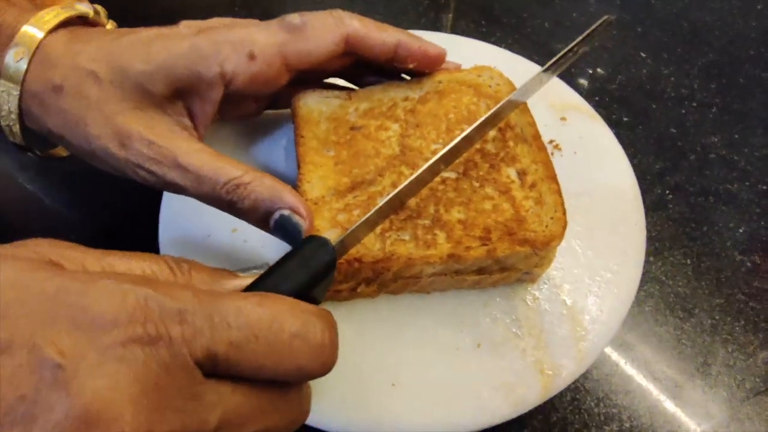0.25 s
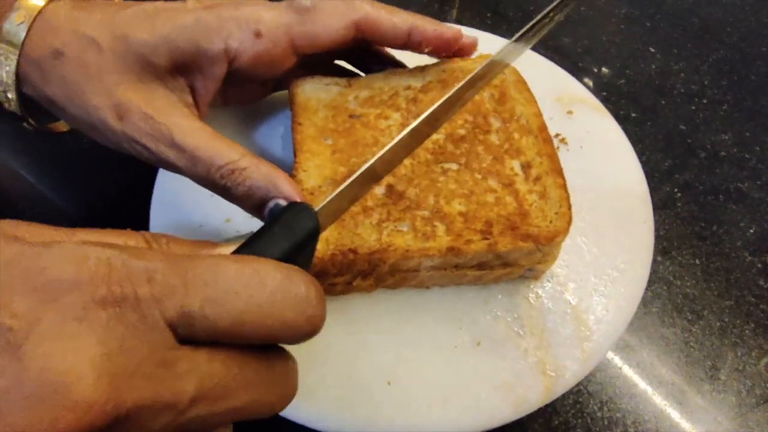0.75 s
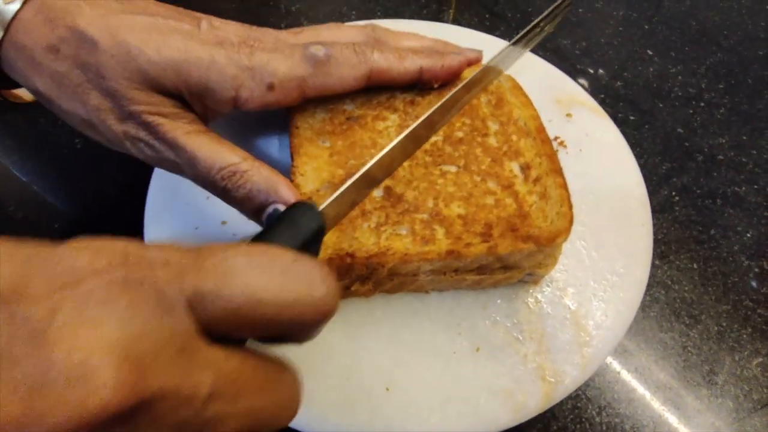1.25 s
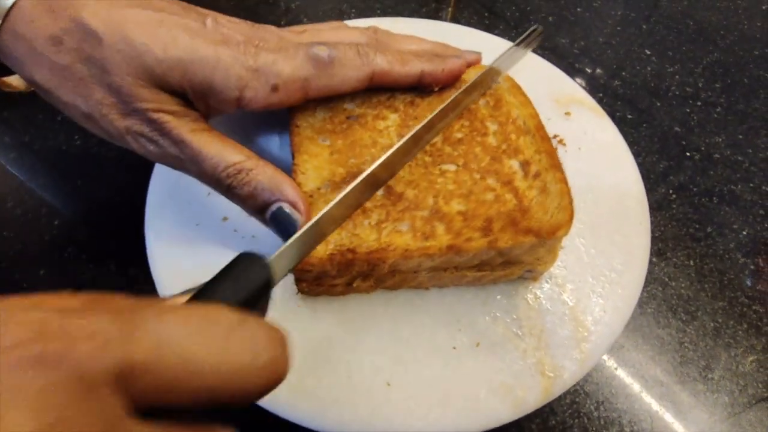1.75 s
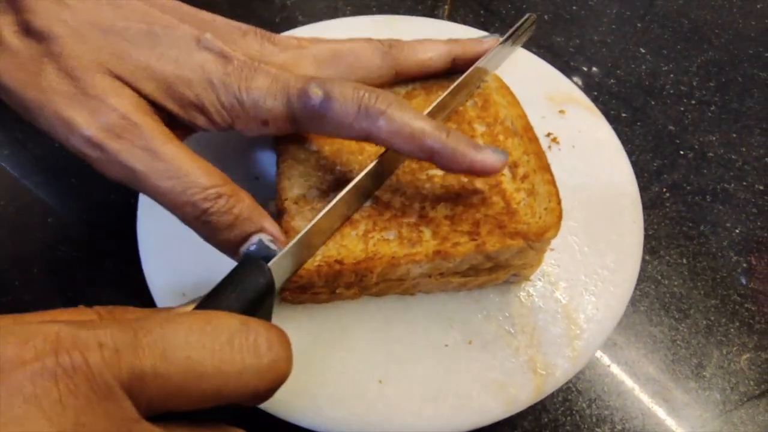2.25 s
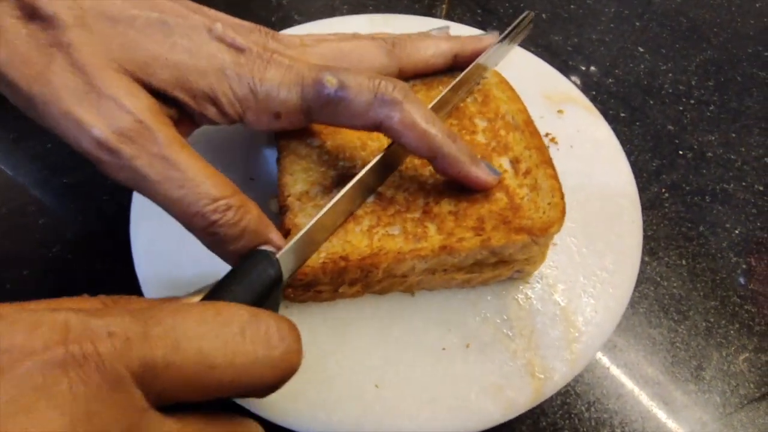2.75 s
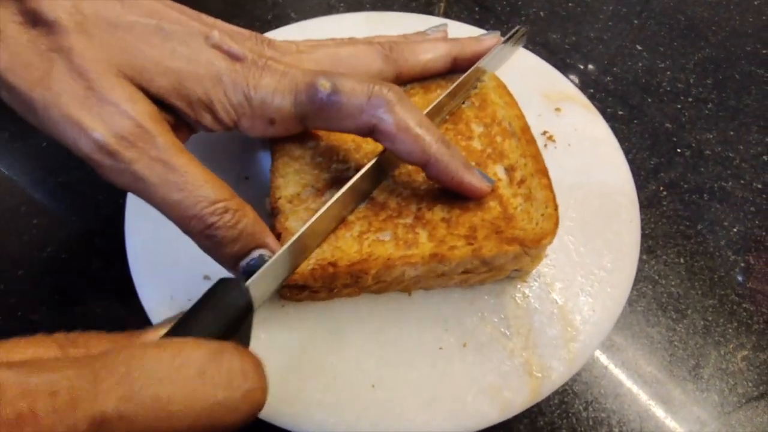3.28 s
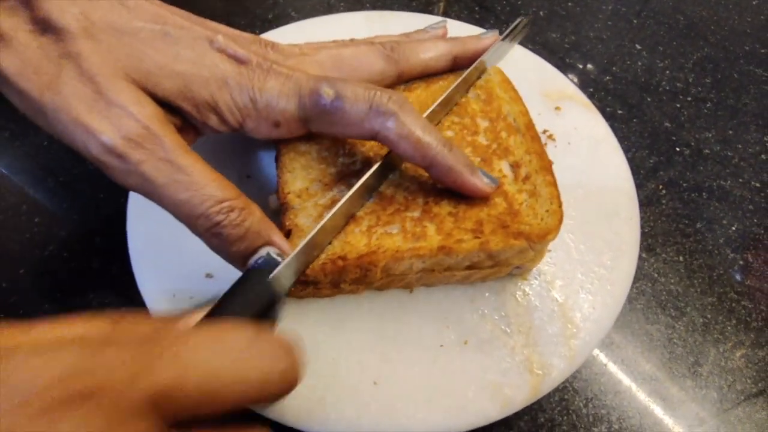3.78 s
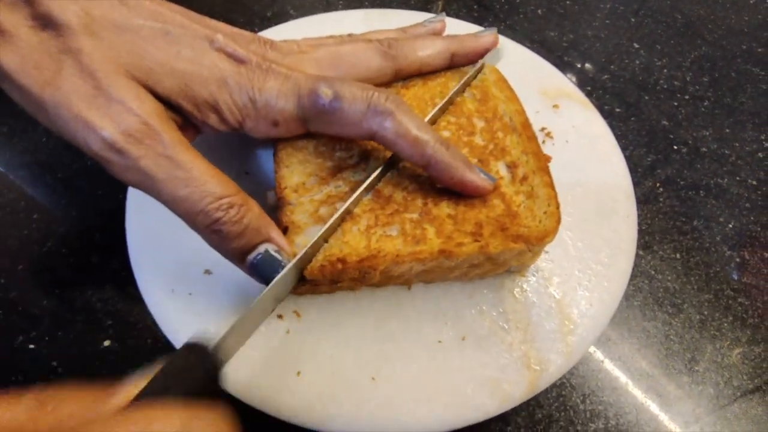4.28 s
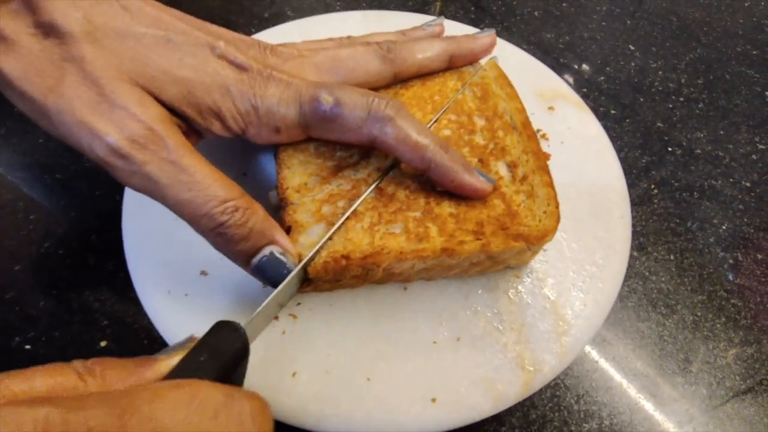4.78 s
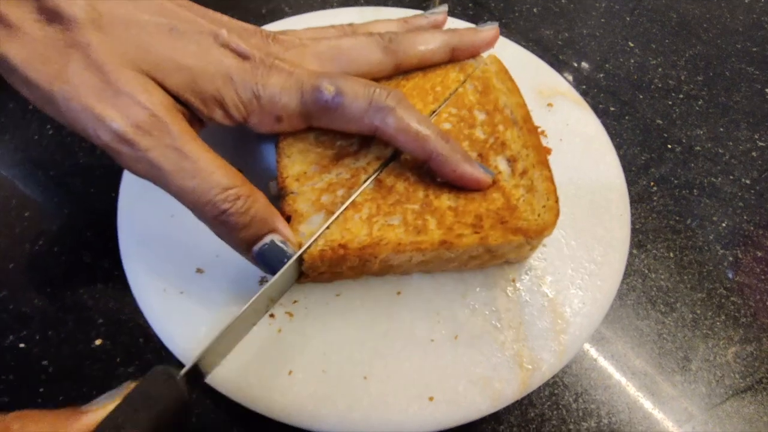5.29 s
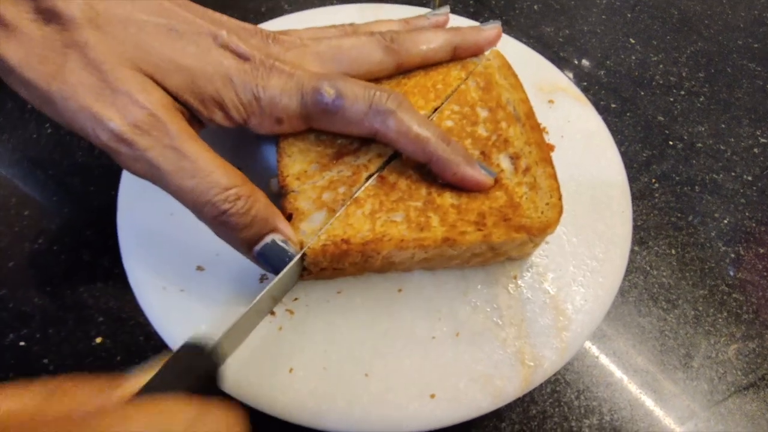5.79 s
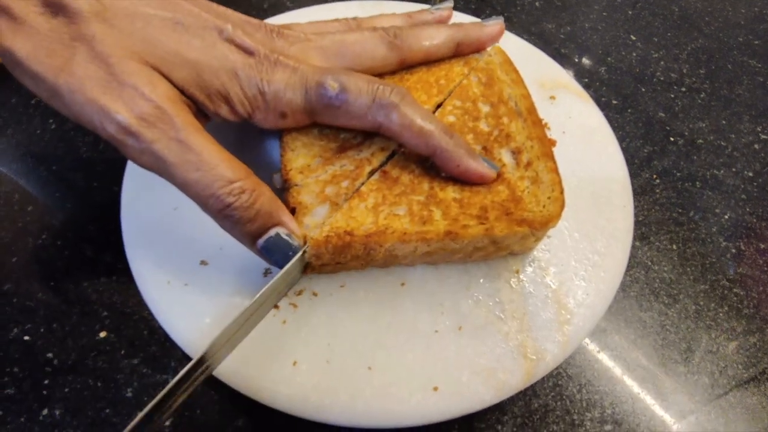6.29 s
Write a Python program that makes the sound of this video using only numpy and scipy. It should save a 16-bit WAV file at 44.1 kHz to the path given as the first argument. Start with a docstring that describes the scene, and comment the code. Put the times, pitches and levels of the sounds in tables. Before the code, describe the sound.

A small kitchen heard close up through a handheld stereo microphone, the knife brighter on the left. It starts almost silent, with tiny ticks; around 0.6 s a low wavering appliance hum with rumble and faint hiss comes up. From 0.7 to 1.5 s a serrated knife makes quick crunchy strokes, about six a second, breaking toasted crust with rasp beneath. A lull follows, with a couple of snaps near 1.65 s. From about 2.3 s come sharp crackles, and from 2.4 to 3.6 s the loudest sawing, full of snapping flakes. It weakens toward 4 s, then becomes soft, faint bread strokes. The plate knocks the counter with a short thud at 4.35 s and more softly at 5.1 s. Stronger crunches return at 5.1, 5.5 and 5.9 s, with slight blade scraping on the plate, fading to crackle and hum by 6.5 s.

```python
"""A small kitchen: a serrated knife saws a crisp toasted sandwich on a plate, close to a handheld camera.
Noise bursts from breaking crust cells and dragged bread follow the blade's speed; flakes snap as short pulses.
The plate knocks on the counter as ringing modes and a thud, and the blade skims it as resonant friction noise.
An appliance hums as wavering tones over rumble and hiss. The camera's left port faces the knife."""
import sys
import numpy as np
from scipy import signal
from scipy.fft import rfft, irfft, next_fast_len
from scipy.io import wavfile
from scipy.ndimage import map_coordinates

SR = 44100
rng = np.random.default_rng(int(sys.argv[2]) if len(sys.argv) > 2 else 0)


def wrap_up_sound(samples):
    """Save the sound to the file named by the first command line argument, as 16-bit audio."""
    columns = np.atleast_2d(samples).T
    # keep every value between -1 and 1, then stretch to whole-number steps
    tamed = np.clip(columns, -1, 1)
    steps = np.round(tamed * 32767).astype(np.int16)
    wavfile.write(sys.argv[1], SR, steps)


N = 288172

# pushes and pulls of the blade: start_s, length_s, fastest_point_share_of_length, crunch_db, rasp_db
STROKES = [(0.552, 0.11, 0.52, -58.5, -67.5), (0.741, 0.097, 0.24, -45.5, -47),
           (0.864, .16, 0.44, -40.5, -49), (1.048, 0.12, 0.56, -39, -46), (1.189, 0.15, .6, -39, -45.5),
           (1.366, 0.11, 0.49, -41.5, -48), (1.484, .14, 0.37, -61, -61), (1.635, 0.33, 0.22, -61, -82),
           (2.252, 0.25, 0.36, -51.5, -60.5), (2.427, 0.12, 0.35, -38, -55.5),
           (2.608, 0.13, 0.38, -40, -58), (2.742, 0.15, 0.92, -40, -55), (2.957, 0.11, 0.33, -35.5, -58),
           (3.104, 0.14, 0.72, -38.5, -50.5), (3.291, 0.15, 0.41, -39, -54.5),
           (3.465, 0.16, 0.53, -45, -55), (3.641, .13, 0.47, -52, -57), (3.819, 0.13, 0.67, -45.5, -46.5),
           (3.938, .15, 0.68, -49, -51.5), (4.11, .16, 0.4, -53.5, -56.5), (4.293, 0.21, 0.45, -59, -62),
           (4.453, 0.14, 0.53, -57, -55.5), (4.614, 0.12, 0.52, -57.5, -61), (4.8, 0.12, 0.31, -56.5, -63),
           (4.969, 0.11, 0.58, -51.5, -52), (5.134, 0.15, 0.66, -40.5, -51), (5.309, .11, 0.41, -52, -60),
           (5.531, .22, 0.33, -43.5, -49), (5.66, 0.29, 0.54, -53, -55), (5.851, 0.28, 0.48, -43.5, -47)]
# tone and place of the crunch: time_s, treble_gain_db, extra_left_minus_right_db
CRISPNESS = [(0.6, -3.5, -1), (1.4, 2, -0.5), (2.4, 0, 1), (3.4, 0, 0.5), (4.0, -0.5, -1), (5.2, -4, -3.5),
             (5.7, -4, -2), (6.05, -2.5, -0.5), (6.5, -7, -7)]
# flakes and ticks at set times, faint to loud: start_s, level_db, pitch_hz
TIMED_FLAKES = [(0.3404, -74, 2270), (0.3945, -69, 4830), (0.453, -54.5, 4720), (0.5863, -43.5, 4630),
                (0.626, -39, 3920), (0.733, -39.5, 3860), (0.7487, -29, 3800), (0.7852, -28.5, 4160),
                (0.9369, -25.5, 5300), (1.1468, -31, 4400), (1.2012, -35, 5690), (1.5085, -33, 5950),
                (1.6401, -29, 2180), (1.6799, -27.5, 7150), (1.8647, -46, 2620), (2.1166, -44, 2770),
                (2.15, -41, 6620), (2.173, -35, 5330), (2.2763, -27, 6150), (2.2827, -31, 3890),
                (2.3496, -25, 6230), (2.3624, -33, 6660), (2.389, -30, 6730), (2.4064, -25.5, 2700),
                (2.4913, -26, 5860), (2.6747, -20.5, 2700), (2.687, -29.5, 2590), (2.798, -22.5, 5910),
                (2.8518, -21, 4200), (2.872, -25.5, 3600), (2.9642, -27.5, 2660), (2.9721, -21, 2970),
                (2.995, -21.5, 3740), (3.0462, -24.5, 5100), (3.123, -31, 5900), (3.2219, -25, 2800),
                (3.2865, -26.5, 3510), (3.3064, -29, 3590), (3.4712, -38, 6790), (3.8033, -37.5, 4770),
                (4.9901, -38.5, 3980), (5.0337, -28, 4120), (5.918, -30.5, 2570), (6.0882, -28, 2360),
                (6.3779, -47, 2550)]
# crust crackling under the weight of blade and hand, also between strokes: time_s, level_db
PRESSING = [(0.53, -100), (0.6, -75), (1.1, -57), (1.7, -61.5), (2.08, -77), (2.6, -54.5), (3.4, -55.5),
            (3.8, -65), (4.3, -58.5), (4.8, -67), (5.3, -62.5), (5.47, -70), (6.1, -62.5), (6.5, -71.5)]
# plate rocking on the counter: start_s, low_thud_db, hard_contact_db
KNOCKS = [(4.349, -23, -30.5), (5.083, -28.5, -48.5)]
# modes of the loaded plate: pitch_hz, relative_level_db, t60_s
PLATE_MODES = [(250, 4, 0.11), (370, -4, 0.073), (528, -3.5, 0.18), (746, -14, 0.085), (820, -0.5, 0.045),
               (933, -14, 0.15), (1045, -11, 0.19), (1233, -3, 0.11), (1373, -1, 0.096), (2460, -25, .05),
               (2700, -26, .05)]
# blade dragging on the plate: start_s, length_s, plate_groan_db, steel_ring_db
SKIMS = [(3.128, 0.13, -49, -70), (3.872, 0.055, -67, -48.5), (4.474, 0.054, -52, -79),
         (5.158, 0.14, -58, -52), (5.557, 0.12, -64, -53), (5.639, 0.22, -49, -71), (5.896, 0.22, -69, -60),
         (6.243, 0.063, -62, -47)]
# blade resonances: pitch_hz, width_hz, relative_level_db
BLADE_MODES = [(1404, 63, 9.5), (2000, 520, -5), (2530, 170, 0.5), (2930, 260, -3.5), (4110, 250, -1.5),
               (5970, 990, -7)]
# background level: time_s, relative_level_db
ROOM_LEVEL = [(0, -75), (0.3, -76.5), (0.575, -64), (0.615, -52.5), (1.0, -50.5), (1.6, -47), (2.1, -50),
              (2.45, -45.5), (2.95, -44), (3.7, -47), (4.05, -44.5), (4.45, -43.5), (4.75, -50.5),
              (5.15, -43), (5.75, -49.5), (6.4, -44.5)]
# appliance hum: pitch_hz, relative_level_db, unsteadiness_db
HUM_TONES = [(50.66, 0, 2.5), (117.8, -6.5, 5.5), (154.4, -9, 0.5)]
# spectra of crust, bread, splinters, dull knock, rumble and hiss: frequency_hz, relative_level_db_per_hz
CRUST_SPECTRUM = [(300, -15), (900, -19), (1600, -8), (2100, 0), (2650, -1), (3300, -3.5), (4800, 0.5),
                  (6300, -1), (7600, -7), (8700, -6.5), (10500, -7), (12700, -2.5), (16000, -7.5)]
BREAD_SPECTRUM = [(60, -20), (140, -1), (220, -1.5), (330, -1), (420, -5), (520, 0.5), (800, 1), (1100, 0),
                  (1380, 1), (1700, -1.5), (2500, -7), (5000, -20.5)]
SPLINTER_SPECTRUM = [(300, -21), (1200, -6), (2300, -0.5), (6500, 1), (8500, -5), (12500, 1), (16000, -3.5)]
KNOCK_SPECTRUM = [(60, -12), (260, 10.5), (410, 0), (600, -2), (1100, 2.5), (1400, -3), (1700, -15),
                  (2800, -13.5), (3500, -36), (8000, -31)]
RUMBLE_SPECTRUM = [(10, -11), (28, -0.5), (40, -14.5), (58, -1.5), (75, -7.5), (125, -6.5), (170, -12.5),
                   (230, -12.5), (320, -21.5), (500, -26), (900, -36.5), (1800, -43.5), (4000, -58)]
HISS_SPECTRUM = [(300, -7), (1000, -18), (1800, 0.5), (2700, 2.5), (6200, -0.5), (8200, -7.5), (12500, -3),
                 (16000, -1)]
# straight sound at the two ports: frequency_hz, left_minus_right_db
PORT_FACING = [(200, 4.5), (1200, 0), (2500, 7), (5000, 9.5), (9000, 13), (14000, 3)]
# likeness of diffuse sound at the two ports: frequency_hz, coherence
PORT_COHERENCE = [(60, 0.98), (150, 0.97), (350, 0.82), (800, 0.69), (1500, 0.13), (16000, 0.016)]

TOP_HZ = 16100  # the camera's band limit
SPEED_POWER, BITE_DB = 0.92, 1.18  # loudness against blade speed; depth of the teeth's catching
SQUASH_DB = -68  # most that the bread sounds as it gives way under the weight
FLAKES_PER_S, FLAKE_HZ = 40, 5200  # rate and middle pitch of small flakes
FLAKE_DB, FLAKE_SPREAD_DB = -28.5, 6  # middle level in the hardest stroke; largest scatter either way
FLAKE_FOLLOW = 0.6  # dB of flake size for each dB of crunch
CRUST_CUT_S, CUT_DB = 3.45, -8.5  # once the top crust is cut through, the small flakes are weaker


def effort():
    """Crunch and rasp in dB: in each stroke the blade speeds up from rest and slows to turn round."""
    pressing_db, = curves(PRESSING)
    crunch = amp(pressing_db) ** 2
    rasp = amp(np.minimum(SQUASH_DB, pressing_db)) ** 2
    for start, length, fastest, crunch_db, rasp_db in STROKES:
        progress = np.arange(int(length * SR)) / (length * SR)
        turn = np.clip(fastest, .1, .9)  # leaves time to speed up and to slow down
        phase = np.interp(progress, [0, turn, 1], [0, .5, 1])
        drive = np.abs(np.sin(np.pi * phase)) ** SPEED_POWER
        add(crunch, start, (amp(crunch_db) * drive) ** 2)
        add(rasp, start, (amp(rasp_db) * drive) ** 2)
    return 10 * np.log10(crunch), 10 * np.log10(rasp)


def sawing(crunch_db, rasp_db):
    """Teeth break crust cells, more of them in a strong stroke, and drag through the bread below."""
    treble_db, left_db = curves(CRISPNESS)
    cells_per_s = 5500 * amp(.7 * (np.maximum(crunch_db, -62) - crunch_db.max()))
    bite_db = BITE_DB * wobble(160)  # the teeth catch and let go unevenly

    cells = amp(crunch_db + bite_db - 4.5) ** 2 * fractures(cells_per_s, spread_db=4.0, life=0.00034)
    crust = kitchen(cells, CRUST_SPECTRUM, near_db=1.5, tail_db=-11, tail_t60=0.34)
    treble = filtered(crust, lambda hz: 1 / (1 + (7500 / (hz + 1)) ** 6))
    crust = crust + (amp(treble_db) - 1) * treble
    crust = crust * amp([left_db / 2, -left_db / 2])

    crumbs = amp(rasp_db + bite_db - 1.57) ** 2 * fractures(cells_per_s, spread_db=4, life=0.00036)
    bread = kitchen(crumbs, BREAD_SPECTRUM, near_db=-1, tail_db=-10.5, tail_t60=0.24)
    return crust + bread


def fractures(rate, spread_db, life):
    """Energy of tiny bursts of random size at a changing rate per second; mean 1."""
    chance = np.clip(rate / SR, 1e-4, .5)
    size = amp(spread_db * np.minimum(rng.standard_normal(N), 2.5))
    breaks = rng.random(N) < chance
    energy = fading(breaks * size ** 2 / chance, life)
    return energy / energy.mean()


def small_flakes(crunch_db):
    """Rows (start_s, level_db, pitch_hz) of flakes that break at random, louder the harder the blade works."""
    draws = rng.standard_normal((400, 4))
    gaps = (draws[:, 0] ** 2 + draws[:, 1] ** 2) / (2 * FLAKES_PER_S)  # exponential waits
    times = STROKES[0][0] + np.cumsum(gaps)
    work_db = np.interp(times * SR, np.arange(N), crunch_db - crunch_db.max())
    level_db = FLAKE_DB + FLAKE_FOLLOW * work_db + CUT_DB * (times > CRUST_CUT_S)
    level_db = level_db + FLAKE_SPREAD_DB * np.tanh(draws[:, 2])
    pitch_hz = FLAKE_HZ * 2 ** (.5 * np.tanh(draws[:, 3]))
    return list(zip(times, level_db, pitch_hz))


def snaps(flakes):
    """A flake breaks with a pulse of a cycle or two, then sheds splinters for about a millisecond."""
    pulses, splinters = np.zeros(N), np.zeros(N)
    t = np.arange(SR // 50) / SR
    for start, level_db, hz in flakes:
        pulse = np.sin(2 * np.pi * hz * t) * np.exp(-t * hz)
        add(pulses, start + .001, amp(level_db + 2) * pulse)
        add(splinters, start + 0.0011, amp(level_db - 6) ** 2 * np.exp(-2 * t / 0.00052))
    return ports(pulses) + kitchen(splinters, SPLINTER_SPECTRUM, near_db=3, tail_db=0, tail_t60=0.15)


def shifting(pair, depth_db=2.5, band_hz=130, rate=7, size=1024):
    """The colour of the toast sounds drifts at random in narrow patches of pitch and time."""
    hz, t, bins = signal.stft(pair, SR, nperseg=size)
    band, frame = np.meshgrid(hz / band_hz, t * rate, indexing="ij")
    knots = rng.standard_normal((2, 512, 128))
    field = np.array([map_coordinates(k, [band, frame], order=1, mode="wrap") for k in knots])
    gain = unit(amp(depth_db * unit(field)))
    return signal.istft(bins * gain, SR, nperseg=size)[1][:, :N]


def knocks():
    """The plate's foot taps the counter and rings briefly; the counter follows with a low thud."""
    ring, thud, blow = np.zeros(N), np.zeros(N), np.zeros(N)
    t = np.arange(SR // 3) / SR
    swell = 1 - np.exp(-t / 0.00084)
    low = np.sin(2 * np.pi * 88 * t) * np.exp(-t / 0.0078) * swell
    for start, thud_db, contact_db in KNOCKS:
        modes = np.zeros(len(t))
        for hz, db, t60 in PLATE_MODES:
            decay = amp(db + rng.normal(0, 2.6) - 60 * t / t60)  # each tap excites the modes differently
            modes += decay * np.sin(2 * np.pi * (hz * t + rng.random()))
        add(ring, start, amp(contact_db - 8.5) * modes)
        add(blow, start, amp(contact_db - 2.5) ** 2 * np.exp(-2 * t / 0.0064))
        add(thud, start + 0.00334, amp(thud_db + 2.5) * low)
    return ports(ring) + thud + kitchen(blow, KNOCK_SPECTRUM, near_db=-0.5, tail_db=-4.0, tail_t60=0.33)


def skims(plate_width_hz=70):
    """Steel slides on the plate: friction noise excites the modes of both."""
    press, touch = np.zeros(N), np.zeros(N)
    for start, length, plate_db, steel_db in SKIMS:
        stroke = np.sqrt(np.abs(np.hanning(int(length * SR))))
        add(press, start, amp(plate_db) * stroke)
        add(touch, start, amp(steel_db) * stroke)
    groan = rubbed([(hz, plate_width_hz, db) for hz, db, t60 in PLATE_MODES])
    steel = rubbed(BLADE_MODES)
    return ports(press * groan + touch * steel)


def rubbed(modes):
    """Steady friction noise through resonances in parallel, with alternating sign; rms 1."""
    def body(f):
        return sum((-1) ** k * amp(db) * 1j * f * width / (hz * hz - f * f + 1j * f * width)
                   for k, (hz, width, db) in enumerate(modes))
    return unit(filtered(rng.standard_normal(N), body))


def background():
    """Wavering hum tones, low rumble and faint hiss share one level, which rises steeply near 0.6 s."""
    level_db, = curves(ROOM_LEVEL)
    t = np.arange(N) / SR
    hum = np.zeros(N)
    for hz, db, waver_db in HUM_TONES:
        level = amp(db + waver_db * wobble(2.995))
        hum += level * np.sin(2 * np.pi * hz * t + 0.44 * wobble(5))
    rumble = diffuse(rng.standard_normal((2, N)), RUMBLE_SPECTRUM)
    hiss = diffuse(rng.standard_normal((2, N)), HISS_SPECTRUM)
    return amp(level_db - 1) * (hum + amp(-1.5) * rumble + amp(-19.5) * hiss)


def kitchen(energy, spectrum, near_db, tail_db, tail_t60, near_life=0.0044, left_db=-1.5):
    """Bursts of noise heard straight, scattered by plate, hands and counter, and then off the walls."""
    direct = filtered(np.sqrt(energy) * rng.standard_normal(N), lambda hz: shape(spectrum, hz))
    near = amp(near_db) ** 2 * fading(energy, near_life)
    walls = amp(tail_db) ** 2 * fading(energy, tail_t60 / np.log(1000))
    scattered = diffuse(np.sqrt(near + walls) * rng.standard_normal((2, N)), spectrum)
    return ports(direct) + amp([[left_db / 2], [-left_db / 2]]) * scattered


def ports(x, lead=0.000292):
    """The straight path: the left port hears the plate first (lead in s), and mostly louder."""
    sides = np.array([[.5], [-.5]])
    return filtered(x, lambda hz: amp(sides * along(PORT_FACING, hz)) * np.exp(2j * np.pi * hz * lead * sides))


def diffuse(pair, spectrum):
    """Two unrelated signals, coloured, as both ports hear them: alike in the bass only."""
    def blend(hz):
        alike = np.clip(along(PORT_COHERENCE, hz), -1, 1)
        return shape(spectrum, hz) * np.sqrt([(1 + alike) / 2, (1 - alike) / 2])
    mid, side = filtered(pair, blend)
    return np.array([mid + side, mid - side])


def fading(energy, life):
    """Spread energy forward in time; the amplitude falls to 1/e within life, in s."""
    keep = np.exp(-2 / (life * SR))
    return signal.lfilter([1 - keep], [1, -keep], energy)


def shape(spectrum, hz):
    """Gain of a spectrum that keeps the power of white noise."""
    return unit(amp(along(spectrum, hz)))


def filtered(x, response):
    """x times a complex response of frequency."""
    m = next_fast_len(N + 4096, True)
    return irfft(rfft(x, m) * response(np.fft.rfftfreq(m, 1 / SR)), m)[..., :N]


def wobble(rate, order=32):
    """A smooth random curve, rate knots a second, worked out every `order` samples."""
    at = np.arange(0, N + order, order)
    knots = rng.standard_normal(int(N * rate / SR) + 4)
    return np.interp(np.arange(N), at, map_coordinates(knots, [at * rate / SR]))


def curves(rows):
    """One value per sample for each column after the time."""
    s, *cols = np.transpose(rows)
    return [np.interp(np.arange(N) / SR, s, c) for c in cols]


def along(points, hz):
    """Read (frequency_hz, value) points on a log frequency axis."""
    f, v = np.transpose(points)
    return np.interp(np.log(hz + 1), np.log(f + 1), v)


def add(track, s, sound):
    """Mix a sound into a track at time s."""
    part = track[max(round(s * SR), 0):][:len(sound)]
    part += sound[:len(part)]


def amp(db):
    """Decibels to gain."""
    return 10 ** (np.asarray(db) / 20)


def unit(x):
    """Scale to rms 1."""
    return x / np.sqrt(np.mean(np.square(x)) + 1e-20)


def scene():
    """Toast, with its drifting colour, over plate and blade and the room behind them."""
    crunch_db, rasp_db = effort()
    flakes = list(TIMED_FLAKES) + small_flakes(crunch_db)
    toast = sawing(crunch_db, rasp_db) + snaps(flakes)
    return shifting(toast) + knocks() + skims() + background()


def record(dry):
    """The camera cuts off steeply above its band limit."""
    return filtered(dry, lambda hz: 1 / (1 + (hz / TOP_HZ) ** 160))


dry = scene()
out = record(dry)
wrap_up_sound(out)
```